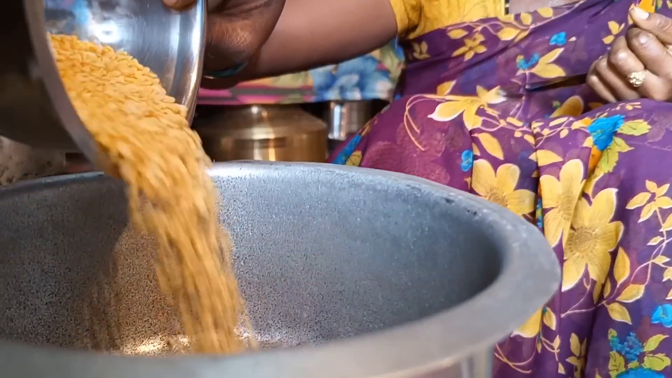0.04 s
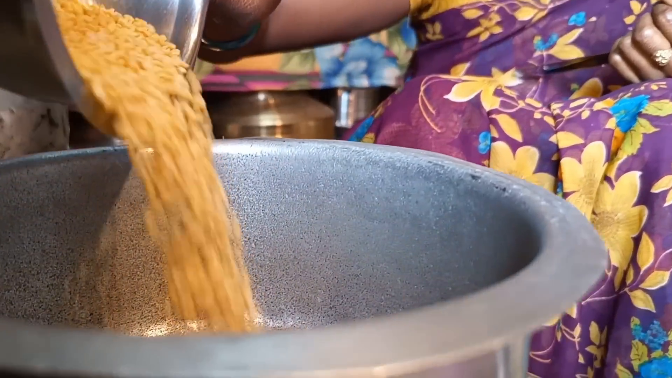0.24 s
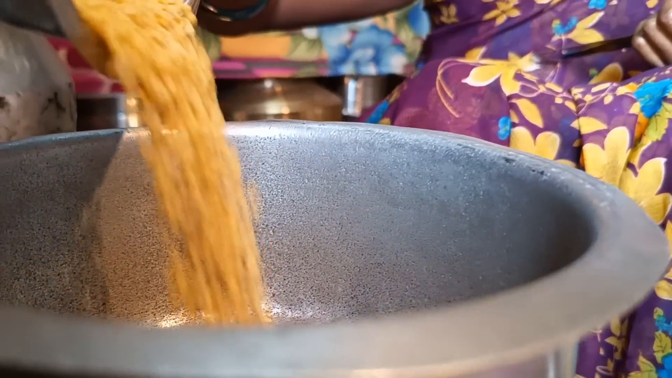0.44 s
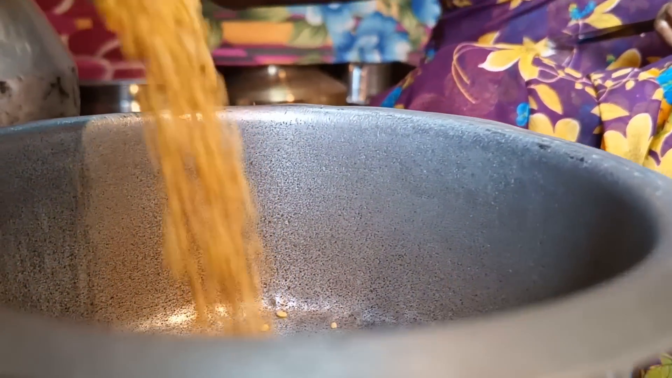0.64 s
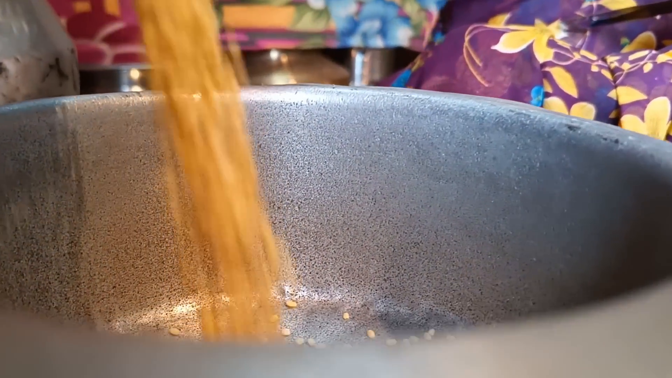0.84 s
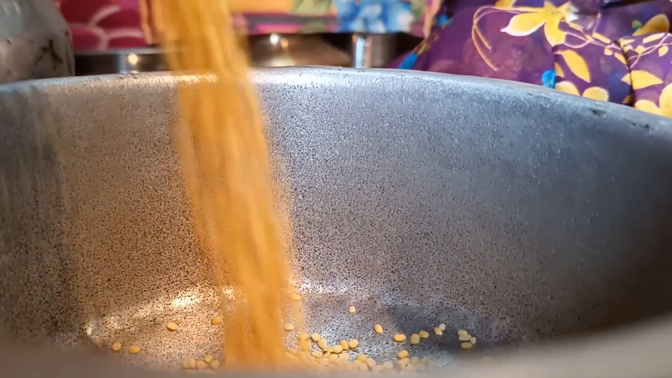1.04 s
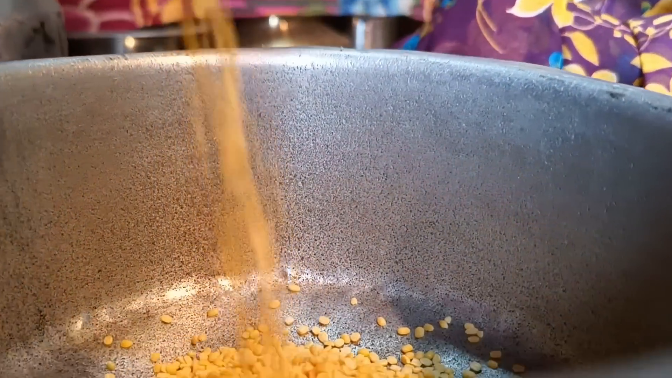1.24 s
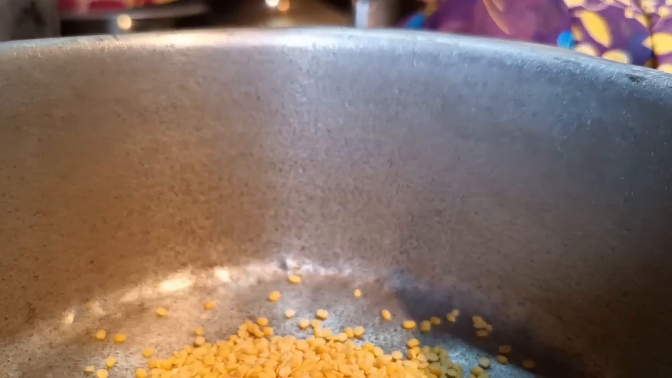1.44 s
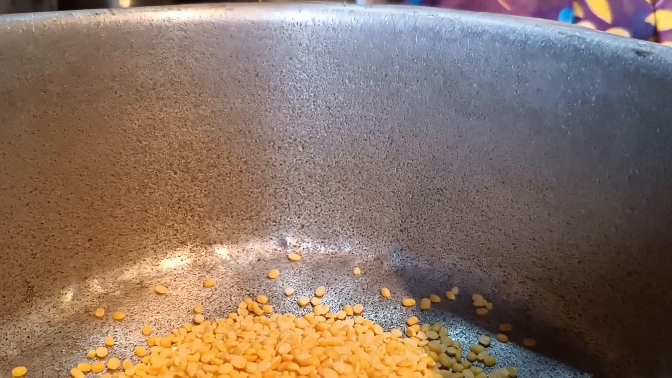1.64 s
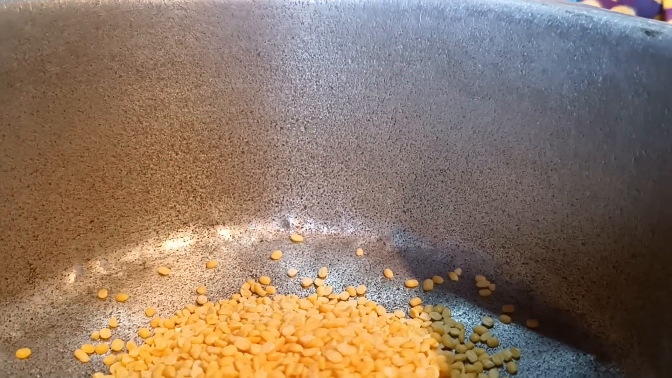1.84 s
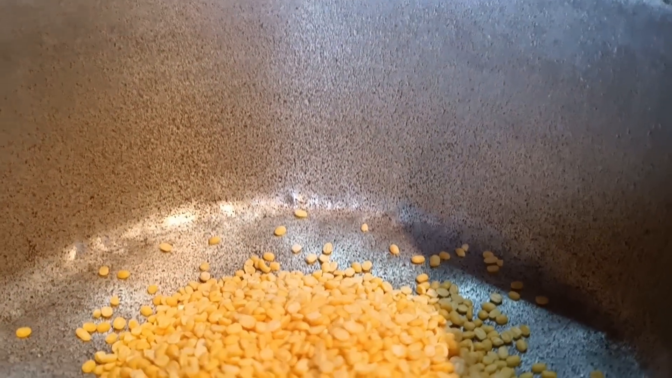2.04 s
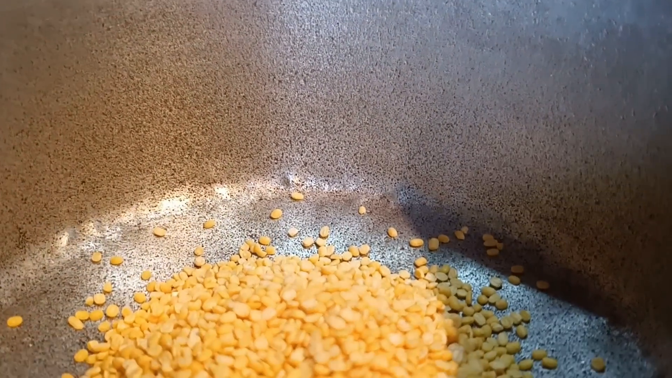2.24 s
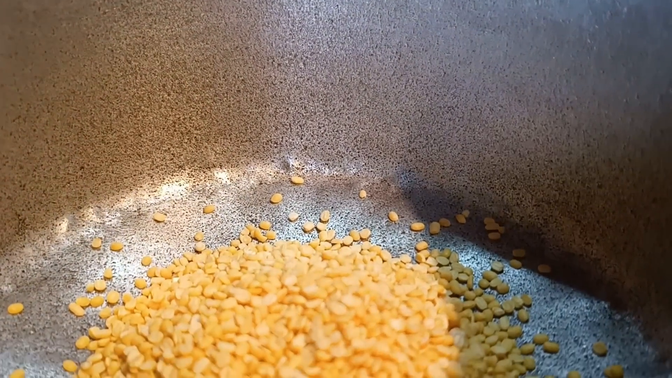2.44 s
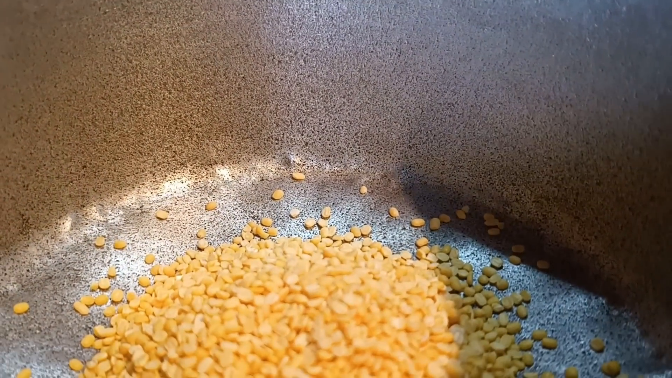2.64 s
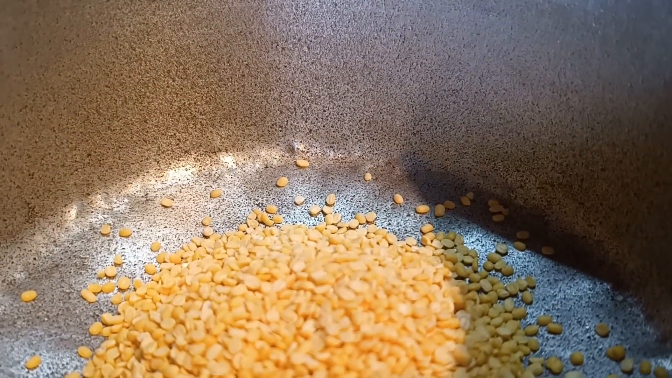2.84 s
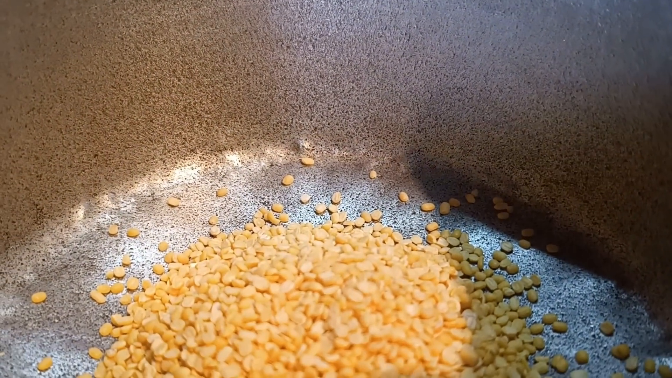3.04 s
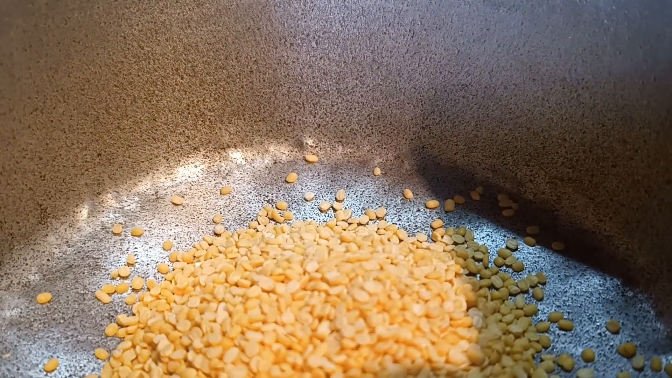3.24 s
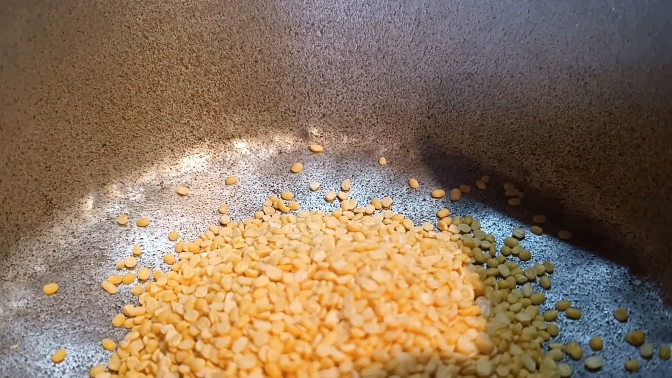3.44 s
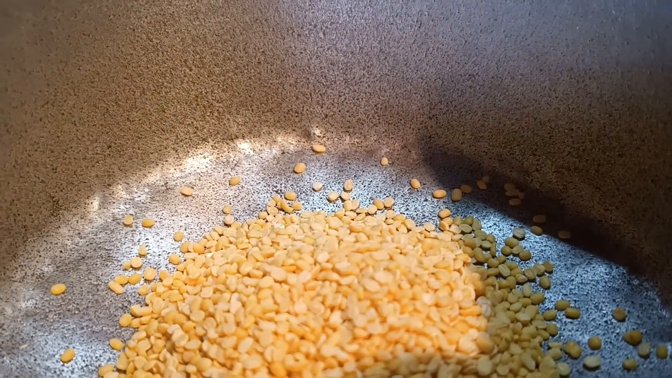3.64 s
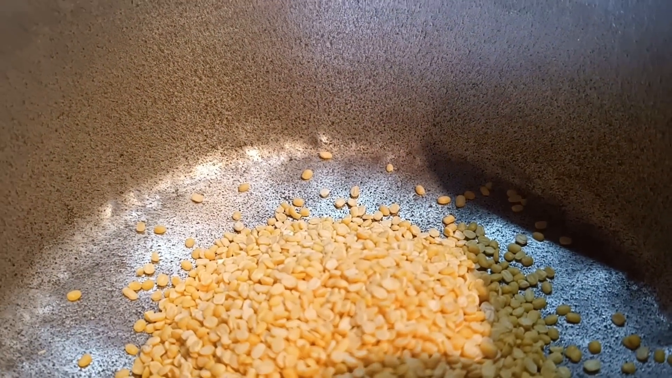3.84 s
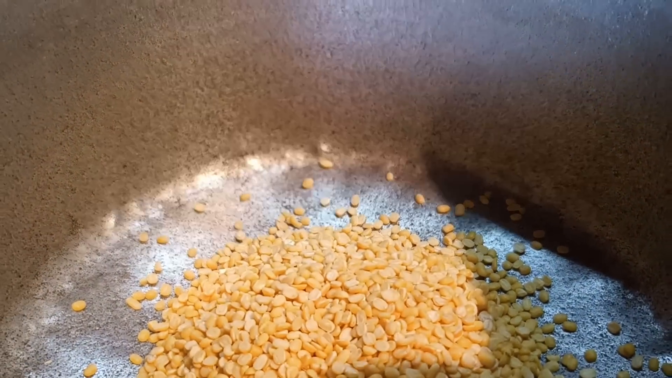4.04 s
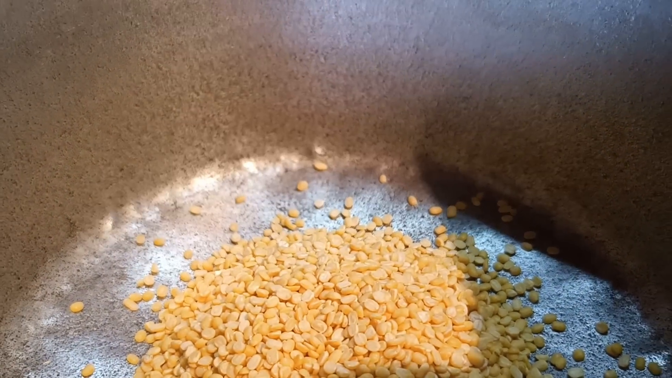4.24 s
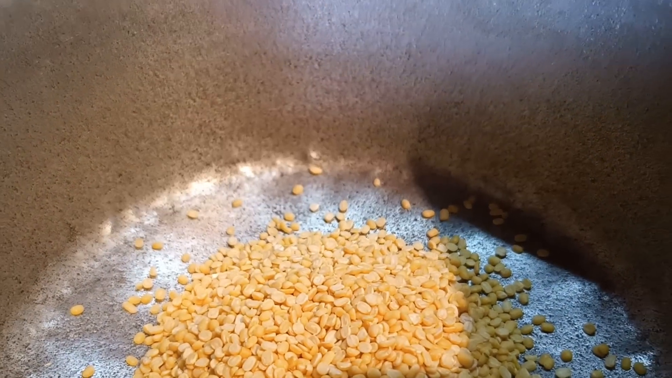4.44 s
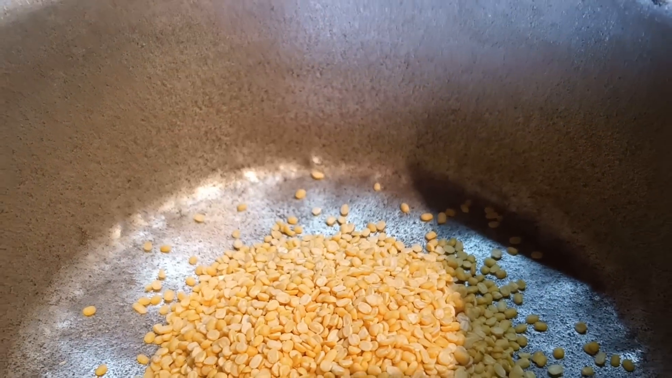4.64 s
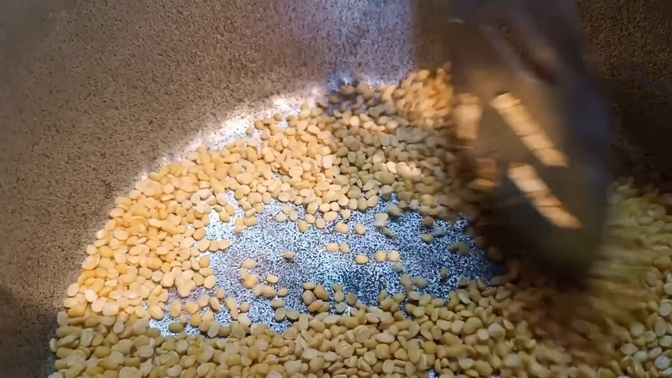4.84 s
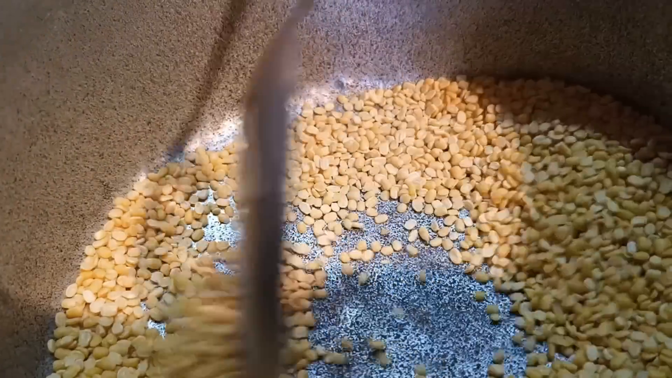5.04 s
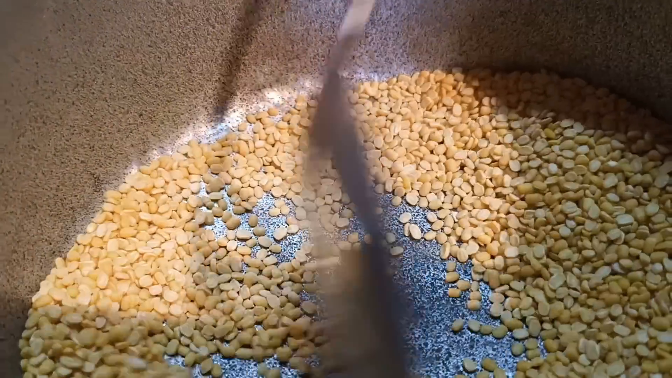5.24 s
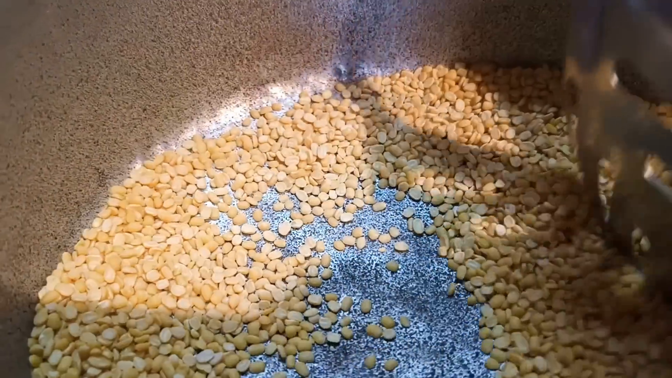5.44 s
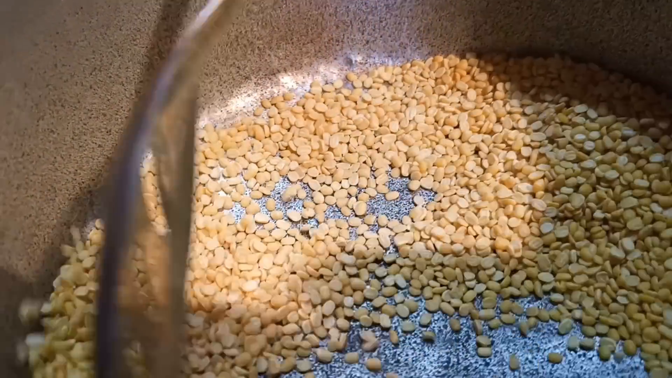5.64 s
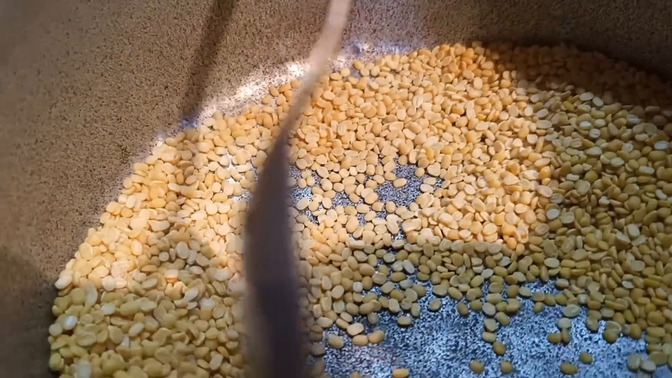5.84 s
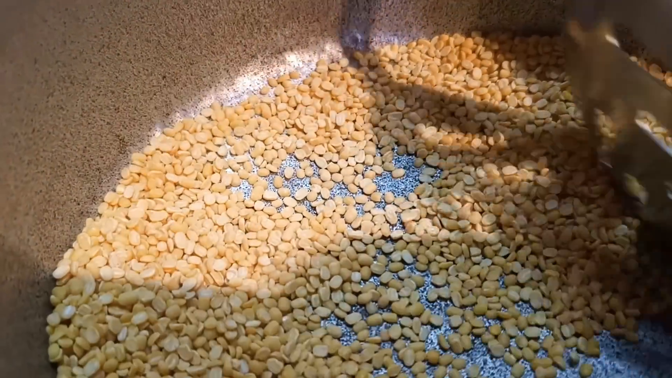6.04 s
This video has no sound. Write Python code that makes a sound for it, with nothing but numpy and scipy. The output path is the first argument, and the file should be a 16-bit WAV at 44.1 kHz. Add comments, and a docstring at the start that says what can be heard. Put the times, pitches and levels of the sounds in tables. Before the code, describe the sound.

Dry lentils pour into a wide metal pot, a bright, ringing patter that dulls as the heap grows and ends with a few stray ticks. After a pause, something hollow is softly bumped and shifted nearby. Then a metal skimmer stirs the lentils, scraping and knocking against the pot while the grains rattle. It is all heard close up in stereo over a low kitchen rumble.

```python
"""In a kitchen, dry lentils pour into a wide metal pot. Their impacts excite the modes of the bare
metal until the growing heap damps them. After a pause something hollow is bumped and shifted close by;
then a metal skimmer stirs, scraping by friction and knocking the pot so that its own blade rings.
Two microphones receive direct and scattered sound over a low room rumble and a faint wavering tone."""
import sys
import numpy as np
from scipy import signal
from scipy.fft import rfft, irfft, next_fast_len
from scipy.io import wavfile
from scipy.ndimage import uniform_filter1d

SR = 44100
rng = np.random.default_rng(int(sys.argv[2]) if len(sys.argv) > 2 else 0)


def generate_wav(sig):
    """Save sig (samples, or channels by samples) to the path in sys.argv[1] as 16-bit PCM at SR."""
    pcm = np.round(np.clip(np.atleast_2d(sig).T, -1, 1) * 32767).astype(np.int16)
    wavfile.write(sys.argv[1], SR, pcm)


N = 269085

# Strength of the stream: t/s, level/dB
FLOW = [(0, -26.5), (.2, -28), (.38, -30.5), (1.15, -32.5), (1.42, -39.5), (1.5, -61), (1.7, -79)]
# Modes of the empty pot, the pot under grain, and the wall the heap leaves free: f/Hz, width/Hz, level/dB
BARE_MODES = [(1457, 25, -1), (2095, 31, 0), (2360, 20.5, -1.5), (2564, 38, 1), (2930, 55, -9),
              (5330, 280, -3.5), (6120, 120, 1), (7360, 111, -6), (7540, 180, -0.5), (10260, 240, -6)]
LOADED_MODES = [(230.3, 38.6, -2.5), (598, 35, -3), (1347, 60, -2), (2102, 71, -6.5), (2230, 110, -7),
                (5310, 400, -6.5), (7570, 150, -9)]
WALL_MODES = [(2135, 48, 1), (2325, 77, -1.5)]
# Impact spectra on metal and on the heap: f/Hz, density/dB
METAL_SPECTRUM = [(590, -75), (1000, -13.5), (2100, -5), (4310, -8.5), (4730, -8.5), (7530, -5.5),
                  (16000, -17)]
HEAP_SPECTRUM = [(100, -38.5), (249, -10.5), (433, -8.5), (608, 4.5), (752, -5), (1150, 3), (2130, -5.5),
                 (16000, -19.5)]
def pour():
    """Impact excitation: grains ring the bare metal, then sound duller as the heap adds damping."""
    covered_s, growth_s = 0.44, 0.071
    covered = 1 / (1 + np.exp((covered_s - np.arange(N) / SR) / growth_s))
    grains = stereo(patter([1], 30000, 1), -18.5, 0.286, scatter_s=0.0042, shift_s=0.0015)
    responses = (body(METAL_SPECTRUM, -2, BARE_MODES, low_hz=1166),
                 body(METAL_SPECTRUM, low_hz=1485),
                 body(HEAP_SPECTRUM, -4, LOADED_MODES[:2] + WALL_MODES))
    # offsets of a second make the three layers incoherent
    metal, ticks, heap = (signal.oaconvolve(np.roll(grains, k * SR, axis=1), ring[None])[:, :N]
                          for k, ring in enumerate(responses))
    stream = (1 - 0.51 * covered) * metal + 0.44 * covered * ticks
    stream += gain_of(-1.5) * (0.081 + covered) * heap
    return envelope(FLOW) * stream


# Last single grains: t/s, level/dB
STRAY_GRAINS = [(1.481, -24), (1.5417, -30.5), (1.5821, -19), (1.6132, -27.5)]
def last_grains():
    """Repeated excitation: stray and bouncing grains keep the pot wall ringing."""
    strays = strikes(STRAY_GRAINS, 1, body(METAL_SPECTRUM, 1.5, WALL_MODES, low_hz=1540), t60=0.0092)
    bouncing = surges(starts=[1.39], levels_db=[-52], holds=[0.15], rise_s=0.046, fade_db_per_s=127)
    skitter = bouncing * patter(body(METAL_SPECTRUM, -19, WALL_MODES), 3000, 3.1)
    return stereo(strays + skitter, -22.5, 0.33, scatter_s=0.008)


# Contact spectrum of the filled pot: f/Hz, density/dB
STIR_SPECTRUM = [(30, -24.5), (584, -9.5), (1070, -19), (2290, -10.5), (3060, -19), (4100, -12.5),
                 (4650, -21), (6000, -14.5), (16000, -22.5)]
def filled_pot():
    """Contact stiffness sets bandwidth: the pot's responses to blunt, edge and tick contact."""
    return (body(STIR_SPECTRUM, 0, LOADED_MODES, low_hz=155, high_hz=880),
            body(STIR_SPECTRUM, -2.5, LOADED_MODES, low_hz=1140, high_hz=3000),
            body(STIR_SPECTRUM, 0.86, LOADED_MODES, low_hz=3900))


# Skimmer on pot: t/s, level/dB, hardness (0 blunt, 1 edge, 2 tick), blade level/dB
KNOCKS = [(4.773, -13.5, 0.6, -25), (4.849, -2.5, 0.98, -23), (4.897, -11.5, 0.5, -18),
          (4.9415, -35, 3, -18), (4.972, -29.5, 0.5, -47), (5.055, -11.5, 1.5, -45), (5.179, -19, 0.1, -49),
          (5.2145, -7.5, 0.5, -49), (5.278, -10, 1.4, -37.5), (5.297, -8, 1.5, -42),
          (5.353, -15.5, 0.42, -42), (5.446, -5, 2.5, -14), (5.494, -16.5, -0.45, -20),
          (5.549, -12, 0.9, -20), (5.851, -15.5, 0.2, -49.5), (5.876, -10.5, -0.13, -43),
          (5.92, -12, 0.8, -34), (5.947, -13.5, 0.7, -38)]
# Modes of the blade: f/Hz, width/Hz, level/dB
BLADE_MODES = [(614, 25, -2), (1290, 18, -6), (1436, 9, 5), (1836, 10, -9), (2060, 16, -5), (3520, 20, -17)]
def skimmer_knocks():
    """Free vibration: each collision leaves both pot and blade ringing in their own modes."""
    blade = strikes(KNOCKS, 3, body(STIR_SPECTRUM, -26, BLADE_MODES), t60=0.0088)
    peaks = by_hardness(KNOCKS, focus_db=13.5)
    blunt, edge, tick = (strikes(peaks, k + 1, ring, t60=0.032, jarring=0.073, detune=0.042)
                         for k, ring in enumerate(filled_pot()))
    return (stereo(blunt, -16, 4.1, scatter_s=0.0033, shift_s=0.11)
            + stereo(edge + tick + blade, -20.5, -0.82, scatter_s=0.0052, shift_s=0.15))


# Strokes: t/s, push level/dB, push hold/s, scrape delay/s, scrape level/dB, scrape hold/s
STIR_STROKES = [(4.751, -35, 0.26, 0.011, -24, 0.061), (4.99, -62, 0.028, 0.017, -29.5, 0.053),
                (5.17, -27.5, 0.089, 0.084, -29, 0.05), (5.483, -31, 0.021, 0.048, -27.5, 0.04),
                (5.747, -36, 0.078, 0.011, -51, 0.14), (5.847, -28, 0.077, 0.043, -29, 0.092),
                (5.98, -37, 0.13, 0.014, -33, 0.08)]
# Swept grains, hushed where the skimmer turns: t/s, level/dB
GRAIN_RATTLE = [(4.754, -38.5), (4.79, -30.5), (5.14, -29.5), (5.235, -37), (5.28, -29), (5.42, -32.5),
                (5.44, -23), (5.49, -39.5), (5.58, -27), (5.7, -30), (5.74, -31), (5.82, -39), (5.9, -32.5),
                (6.1, -28.5)]
def stirring():
    """Friction as many small impacts: the skimmer pushes the pot floor, scrapes and sweeps the grains."""
    start_s, rise_s = 4.754, 0.005
    push_rest_db, scrape_rest_db = -83, -44  # between strokes
    hand_sway = (44.7, 13, -7.5)
    low = body(STIR_SPECTRUM, -4, LOADED_MODES + [hand_sway], high_hz=666)
    _, mid, high = filled_pot()
    begun = np.clip((np.arange(N) / SR - start_s) / 0.0012, 0, 1)
    lands, push_db, push_s, delay, scrape_db, scrape_s = np.transpose(STIR_STROKES)
    pushing = surges(lands, push_db, push_s, rise_s, fade_db_per_s=137)
    scraping = surges(lands + delay, scrape_db, scrape_s, rise_s, fade_db_per_s=139)
    push = (pushing + begun * gain_of(push_rest_db)) * patter(low, 600, 2.34)
    scrape = (scraping + begun * gain_of(scrape_rest_db)) * patter(mid, 1500, 4.7)
    rattle = begun * envelope(GRAIN_RATTLE) * patter(high, 8300, 7.9)
    return stereo(push, -2, 5.2, shift_s=0.034) + stereo(scrape + rattle, -13, -2.6, shift_s=0.032)


# Contact spectrum of the hollow object: f/Hz, density/dB
OBJECT_SPECTRUM = [(30, -54), (134, 5), (437, -13), (801, -17), (2480, -18.5), (3140, -22), (7470, -38),
                   (16000, -62.5)]
# Its modes: f/Hz, width/Hz, level/dB
HOLLOW_MODES = [(215, 38, -5), (441.5, 49, 0.5), (714, 200, -20), (2114, 26, -4.5), (2480, 75, -8.5)]
# Its bumps: t/s, level/dB, hardness (0 thud, 1 knock, 2 tick), tail T60/s
OBJECT_BUMPS = [(2.515, -37.5, 2.3, 0.15), (3.072, -19, 1.13, 0.13), (3.23, -24, 1.6, 0.21),
                (3.256, -14.5, 0.54, 0.12), (3.442, -22.5, 0.54, 0.19), (3.518, -37, 0.79, 0.044),
                (3.624, -19, 0.3, 0.14), (3.84, -35.5, 0.46, 0.053), (3.854, -28.5, 0.34, 0.047),
                (4.054, -29.5, 3.6, 0.12), (4.305, -30.5, 0.58, 0.05), (4.424, -32, 0.38, 0.043),
                (4.564, -32.5, 0.3, 0.045), (4.168, -35.5, 0.41, 0.05), (4.687, -42, 2.2, 0.36)]
BUMP_FOCUS_DB = 3
def bumps():
    """Resonance of a hollow body: it rings at each bump, and lower when set down under the hand's load."""
    thud = body(OBJECT_SPECTRUM, -8, HOLLOW_MODES, low_hz=250, high_hz=900)
    knock = body(OBJECT_SPECTRUM, -0.5, HOLLOW_MODES, low_hz=725, high_hz=3900)
    tick = body(OBJECT_SPECTRUM, low_hz=4450)
    held = body(OBJECT_SPECTRUM, -11.5, HOLLOW_MODES, low_hz=366, high_hz=1480)
    peaks = by_hardness(OBJECT_BUMPS, BUMP_FOCUS_DB)
    t60 = np.array(OBJECT_BUMPS)[:, -1]
    bumped = sum(strikes(peaks, k + 1, ring, t60, jarring=0.032 + 0.066 * k, detune=0.071)
                 for k, ring in enumerate((thud, knock, tick)))
    set_down = strikes([(3.072, -19), (3.085, -16.5)], 1, held, t60=0.068, pitch=0.595)
    return bumped + set_down


# Scuffs of the object: t/s, level/dB, loss from lows to mids/dB, half length/s
OBJECT_SCUFFS = [(2.345, -54, 4.5, 0.043), (2.443, -49, 13.5, 0.046), (2.543, -47.5, 1.5, 0.034),
                 (2.635, -45, 5.5, 0.018), (3.131, -33.5, 3, 0.032), (3.2, -39.5, 3.5, 0.036),
                 (4.09, -41, 20, 0.17), (4.194, -30.5, 14, 0.032), (4.285, -54, -1.5, 0.03),
                 (4.342, -29.5, 10, 0.035), (4.423, -30, 17.5, 0.039), (4.47, -67.5, -5, 0.048),
                 (4.558, -34.5, 19, 0.052)]
def rubbing():
    """Sliding friction: the object scuffs as it shifts and rubs as it settles after each bump."""
    hand_sway = (49.6, 23, -0.22)
    low = body(OBJECT_SPECTRUM, 0, [hand_sway], high_hz=730)
    mid = body(OBJECT_SPECTRUM, low_hz=810, high_hz=3060)
    high = body(OBJECT_SPECTRUM, low_hz=4450)
    starts, thud_db = by_hardness(OBJECT_BUMPS, BUMP_FOCUS_DB).T[:2]
    settling = surges(starts, thud_db - 22, holds=[0.019], rise_s=0.019, fade_db_per_s=29.5)
    times, db, loss_db, half_s = np.transpose(OBJECT_SCUFFS)
    lows = np.hypot(swells(times, db, half_s), settling) * patter(low, 500, 1)
    mids = np.hypot(swells(times, db - loss_db, half_s), settling * gain_of(-14.5)) * patter(mid, 1500, 1.3)
    hiss = swells(times, db - 2.42 * loss_db - 2, half_s) * patter(high, 6000, 9)
    return lows + mids + hiss


# Swells of the tone: t/s, level/dB, half length/s
TONE_SWELLS = [(1.98, -58, 0.042), (4.08, -50, 0.084)]
def faint_tone():
    """Narrow-band noise: a randomly driven resonance is heard as a wavering pitch."""
    ring = body([(20, -60), (16000, -60)], modes=[(1818, 40, 0)])
    return stereo(swells(*np.transpose(TONE_SWELLS)) * patter(ring, 4000, 0.78), -15.5, 0)


# Room noise spectrum: f/Hz, density/dB
ROOM_SPECTRUM = [(30, -4.5), (110, -6.5), (230, -15), (300, -18), (740, -28), (1200, -24), (2400, -32.5),
                 (4300, -47.5), (4900, -35), (6200, -37.5), (8000, -53.5), (16000, -66)]
# Gain on the background, which comes up during the pour and then drops: t/s, level/dB
BACKGROUND_GAIN = [(.35, -11), (.6, -1.5), (1.4, 0.5), (1.798, -7)]
def kitchen():
    """Amplitude-modulated noise: a lumpy low rumble and faint hiss, scaled by the background gain."""
    level_db, wander_db = -44.5, 0.5
    wander = unit_rms(uniform_filter1d(uniform_filter1d(rng.standard_normal(N), 5000), 5000))
    air = unit_rms(signal.oaconvolve(rng.standard_normal(N + SR), body(ROOM_SPECTRUM))[SR // 2:][:N])
    gain = gain_of(level_db + wander_db * wander) * envelope(BACKGROUND_GAIN)
    return stereo(gain * air, -10.5, 0.38, scatter_s=0.14)


# Direct sound at both microphones: f/Hz, share of power
DIRECT_SHARE = [(60, .93), (500, .96), (1500, .85), (3000, .55), (8000, .15)]
def stereo(x, lag, pan_db, scatter_s=0.0076, shift_s=0.006):
    """Superposition of direct sound, lag samples later on the left, and scattering by changing paths."""
    paths, size = 4, next_fast_len(N + SR // 4)
    hz, t = np.fft.rfftfreq(size, 1 / SR), np.arange(SR // 10) / SR
    echoes = rng.standard_normal((paths, 2, len(t))) * np.exp(-t / scatter_s)
    echoes = rfft(echoes / np.linalg.norm(echoes, axis=2, keepdims=True), size)
    step = round(shift_s * SR)
    weights = rng.standard_normal((N // 64, paths)).T[:, np.arange(N) // step]
    weights = uniform_filter1d(weights, size=step, axis=1)
    scattered = (rfft(x * weights / np.linalg.norm(weights, axis=0), size)[:, None] * echoes).sum(0)
    share = np.clip(at_frequency(DIRECT_SHARE, hz), 0, 1)
    direct = rfft(x, size) * np.exp(-1j * np.pi * hz * lag / SR * np.array([[1], [-1]]))
    both = np.sqrt(share) * direct + np.sqrt(1 - share) * scattered
    return irfft(both, size)[:, :N] * gain_of([[pan_db / 2], [-pan_db / 2]])


def body(spectrum, spectrum_db=0, modes=(), low_hz=1, high_hz=103000):
    """Minimum-phase impulse response of a broad spectrum plus Lorentzian modes, band-limited."""
    hz = abs(np.fft.fftfreq(2 ** 14, 1 / SR)) + 1
    power = gain_of(at_frequency(spectrum, hz) + spectrum_db) ** 2
    power += sum(gain_of(db) ** 2 / (1 + (2 * (hz - f) / width) ** 2) for f, width, db in modes)
    power = power / (1 + (low_hz / hz) ** 6) / (1 + (hz / high_hz) ** 6)
    log_gain = np.log(power + 1e-12) / 2
    ring = np.fft.ifft(np.exp(np.conj(signal.hilbert(log_gain)))).real[:6000]
    return ring / np.linalg.norm(ring)


def patter(ring, per_s, spread_db):
    """Shot noise: random impacts of uneven size drive a response; rms 1."""
    chance, size, sign = rng.random((3, N))
    hits = (chance < per_s / SR) * gain_of(-spread_db * np.log(size + 0.03)) * np.sign(sign - .5)
    return unit_rms(signal.oaconvolve(hits, ring)[:N])


def strikes(rows, db_column, ring, t60, jarring=0.029, detune=0, pitch=1):
    """Convolution: an impulse with a jarring tail drives the response, which detune varies per hit."""
    hits, t = np.zeros(N + SR), np.arange(SR // 4) / SR
    taps = np.arange(len(ring))
    for row, tail_s in zip(rows, np.clip(t60, .01, .3) * np.ones(len(rows))):
        tail = np.clip(t / 0.00042, 0, 1) * gain_of(-60 * t / tail_s)
        force = jarring * tail * rng.standard_normal(len(t))
        force[SR // 500] = 1  # the contact closes after 2 ms
        ratio = pitch * (1 + detune * rng.uniform(-1.2, 1))
        sound = signal.oaconvolve(force, np.interp(taps * ratio, taps, ring, right=0))[:len(t)]
        hits[round(row[0] * SR):][:len(t)] += gain_of(row[db_column]) * sound / abs(sound).max()
    return hits[:N]


def by_hardness(rows, focus_db):
    """Harder contact excites higher bands. Returns t/s and low, middle and high level/dB."""
    rows = np.array(rows)
    return np.c_[rows[:, 0], rows[:, 1:2] - focus_db * (rows[:, 2:3] - np.arange(3)) ** 2]


def surges(starts, levels_db, holds, rise_s, fade_db_per_s):
    """Power sum of gains that rise, hold, then decay exponentially."""
    t = np.arange(N) / SR - np.c_[starts]
    fade_db = fade_db_per_s * np.maximum(t - np.c_[holds], 0)
    return np.linalg.norm(np.clip(t / rise_s, 0, 1) * gain_of(np.c_[levels_db] - fade_db), axis=0)


def swells(middles, levels_db, half_s):
    """Power sum of Gaussian gains."""
    t = np.arange(N) / SR - np.c_[middles]
    return np.linalg.norm(gain_of(np.c_[levels_db]) * np.exp(-(t / np.c_[half_s]) ** 2 / 2), axis=0)


def envelope(points):
    return gain_of(np.interp(np.arange(N) / SR, *np.transpose(points)))


def at_frequency(points, hz):
    f, value = np.transpose(points)
    return np.interp(np.log(hz + 1), np.log(f + 1), value)


def gain_of(db):
    return 10 ** (np.asarray(db) / 20)


def unit_rms(x):
    return x / np.sqrt(np.mean(x ** 2) + 1e-20)


def scene():
    """Linear superposition of all sources."""
    lentils = pour() + last_grains()
    hollow_object = stereo(rubbing() + bumps(), -4.5, 0.66, scatter_s=0.0026, shift_s=0.049)
    return lentils + hollow_object + skimmer_knocks() + stirring() + faint_tone() + kitchen()


def record(dry):
    """Band limiting: a linear-phase low-pass removes the highest treble."""
    low_pass = signal.firwin(511, cutoff=16030, window=("kaiser", 8), fs=SR)
    return signal.oaconvolve(dry, low_pass[None], "same")


dry = scene()
out = record(dry)
generate_wav(out)
```